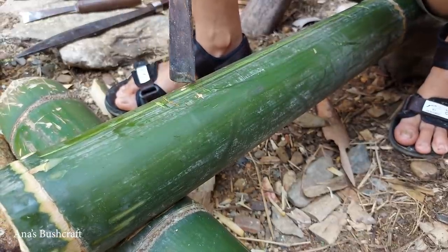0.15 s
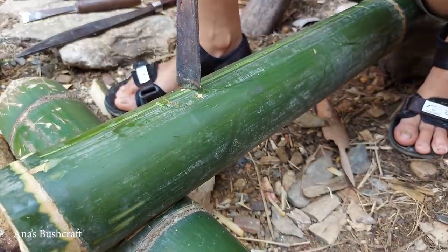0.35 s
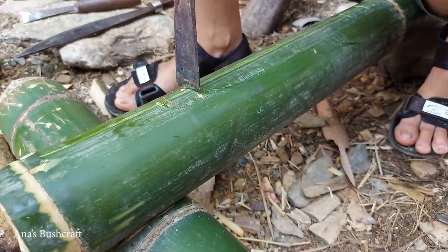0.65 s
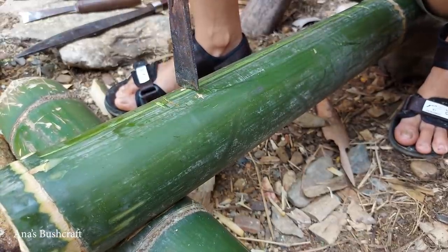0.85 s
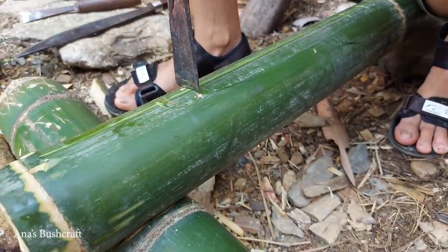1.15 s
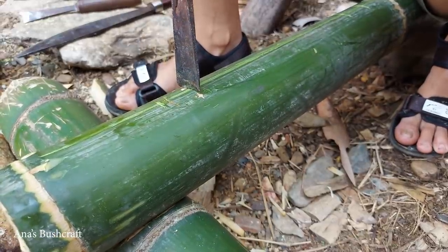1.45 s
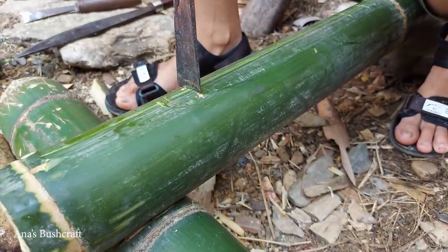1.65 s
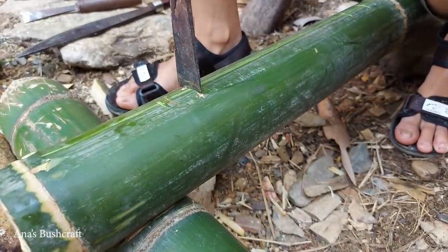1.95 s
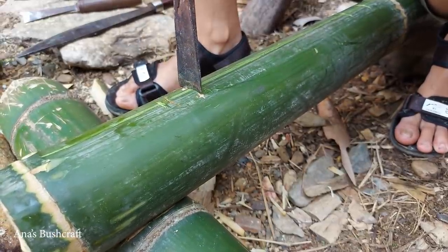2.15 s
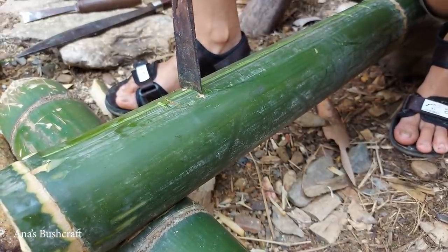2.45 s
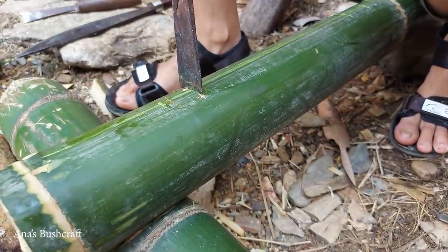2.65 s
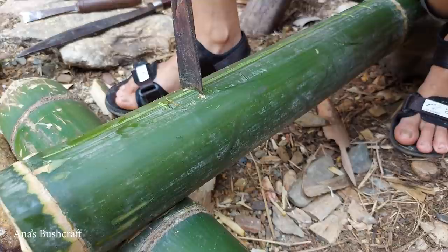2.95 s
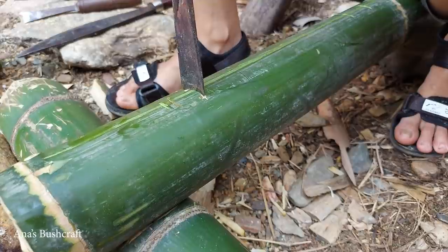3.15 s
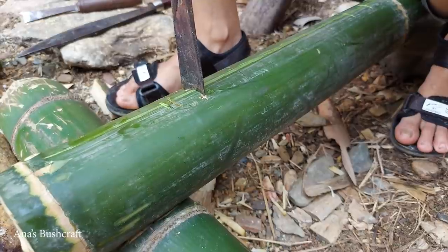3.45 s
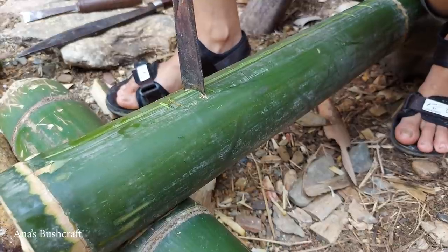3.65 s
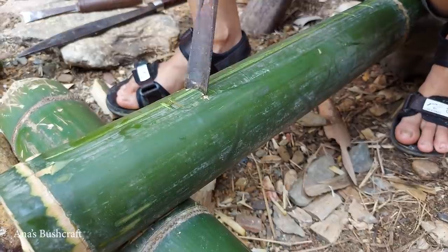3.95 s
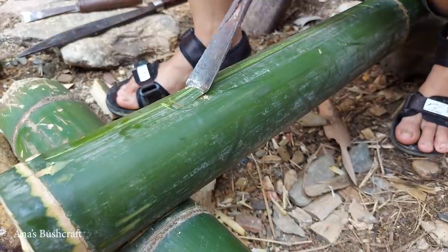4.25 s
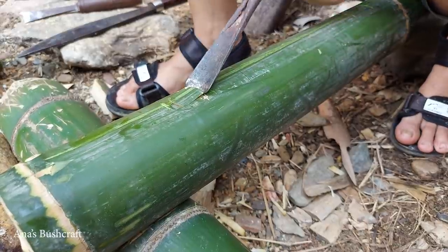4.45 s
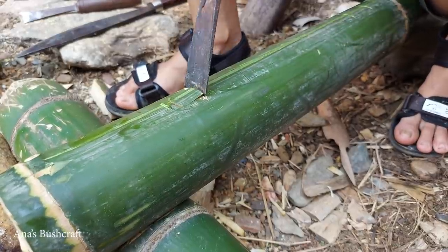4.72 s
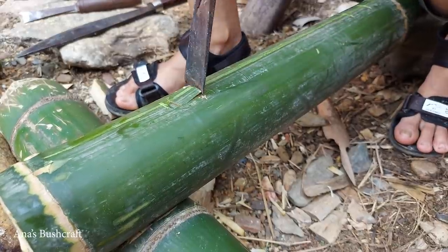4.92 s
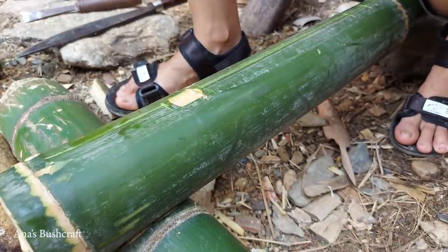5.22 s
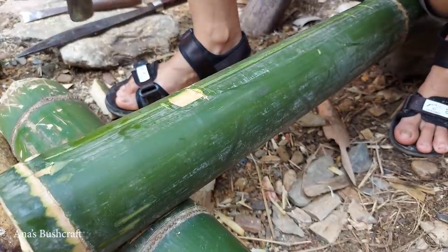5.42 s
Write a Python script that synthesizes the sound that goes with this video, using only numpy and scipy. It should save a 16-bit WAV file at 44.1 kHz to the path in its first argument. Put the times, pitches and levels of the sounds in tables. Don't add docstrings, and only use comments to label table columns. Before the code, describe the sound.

Bamboo working beside a stream: quiet bubbling water, then a steady run of seven loud, dry, near-clipping knocks with hollow tube ring and splitting crack, each trailed by a light clack and short open-air scatter. Automatic gain drops the water after the first blow. Later the blade is levered, snapping fibres sharply, pops loose with tiny high metallic ticks, and a chip lands on stone while the water returns.

```python
import sys
import numpy as np
from scipy import signal
from scipy.fft import rfft, irfft, next_fast_len
from scipy.io import wavfile
from scipy.ndimage import uniform_filter1d

SR = 44100
rng = np.random.default_rng(int(sys.argv[2]) if len(sys.argv) > 2 else 0)


def voltage_ratio(level):
    return 10 ** (np.asarray(level, float) / 20)


def pcm_store(signal):
    levels = np.round(np.clip(np.atleast_2d(signal), -1, 1) * 32767)
    wavfile.write(sys.argv[1], SR, levels.astype(np.int16).T)


N = 246078
HALVES = np.array([[.5], [-.5]])

# first contact in seconds, strength in dB, give of the pole in dB,
# split in dB, tilt of the shell's ring in dB per octave.
BLOWS = [
    (1.2345, 0.5, -6, -10, -11),
    (1.5881, 1, -6, -15, 2),
    (1.9613, 0.5, -8.5, -14, -3),
    (2.3485, -0.5, -14.5, -13, 0),
    (2.719, 1.5, -13.5, -18.5, 1),
    (3.1138, -0.5, -9.5, -14.5, 0.5),
    (3.4995, 2, -18, -9.5, -6.5),
]


def unit(x):
    return x / np.sqrt(np.mean(x ** 2) + 1e-20)


def along(points, hz):
    f, v = np.transpose(points)
    return np.interp(np.log(hz + 1), np.log(f + 1), v)


def filtered(x, response):
    m = next_fast_len(x.shape[-1] + 4096)
    spectrum = rfft(x, m) * response(np.fft.rfftfreq(m, 1 / SR))
    return irfft(spectrum, m)[..., :x.shape[-1]]


def add(track, s, sound):
    track[:, round(s * SR):][:, :sound.shape[1]] += sound


def patchy(spectrum, patchy_db):
    z = signal.stft(rng.standard_normal((2, N)), nperseg=512)[2]
    field = rng.standard_normal(z.shape[1:])
    field = uniform_filter1d(field, size=4, axis=0)
    field = uniform_filter1d(field, size=6, axis=1)
    pair = signal.istft(z * voltage_ratio(patchy_db * unit(field)), nperseg=512)[1][:, :N]
    return unit(filtered(pair, lambda hz: voltage_ratio(along(spectrum, hz))))


def bubbles(count, centre_hz, spread, cycles, scatter_db):
    draw, k = rng.random((count, 2)), np.arange(SR // 20)
    hz = centre_hz * np.exp(spread * rng.standard_normal((count, 1)))
    turns = k / SR * hz
    size = voltage_ratio(-scatter_db * np.log(draw[:, 1:] + 0.00038))
    envelope = size * turns * np.exp(-4 * turns / cycles)
    grains = envelope * np.sin(2 * np.pi * turns * (1 + 0.13 * turns / cycles))
    at = (draw[:, :1] * N).astype(int) + k
    return unit(np.bincount(at.ravel(), grains.ravel(), N + SR)[:N])


def stream():
    # time in seconds, level in dB.
    gain = [(0.0, -40.5), (0.23, -39), (0.43, -36), (0.96, -33), (1.13, -31.5), (1.3, -40), (2.22, -44),
            (3.54, -44.5), (3.81, -45.5), (4.33, -46), (4.82, -41.5), (5.33, -35), (5.58, -33.5)]
    # frequency in Hz, level in dB per Hz.
    gurgle_colour = [(25, -15), (60, -31.5), (130, -13), (260, -9.5), (345, 1.5), (440, -7), (600, -11.5),
                     (850, -9), (1000, -5.5), (1150, -12.5), (1600, -12.5), (2500, -18), (4500, -20.5),
                     (7000, -28), (11000, -29)]
    # frequency in Hz, level in dB per Hz.
    spray_colour = [(3000, -16), (6000, -2), (8600, -3.5), (9500, -3.5), (10500, 2), (12500, 2),
                    (15600, -3), (15900, -40)]
    # frequency in Hz, likeness from 0 to 1.
    alike = [(60, 0.88), (300, 1), (800, 0.76), (2000, 0.44), (4000, 0.37), (6000, 0.29)]
    # frequency in Hz, left minus right in dB.
    shade = [(60, 0.5), (99, 1), (160, -1.5), (270, -0.5), (450, 3), (740, -3.5), (1220, 0.5), (2010, 0),
             (3330, -2), (5500, -5), (9080, -3.5), (15000, -4)]
    gurgle_db, spray_db = 4.5, -8.5
    lag = 18

    water = patchy(gurgle_colour, patchy_db=2.0)
    water[0] += voltage_ratio(-7.5) * bubbles(count=900, centre_hz=337.8, spread=0.1724, cycles=9.5, scatter_db=3.0)
    water[0] += voltage_ratio(-10.5) * bubbles(count=1400, centre_hz=906, spread=0.432, cycles=6.8, scatter_db=-2.0)

    def blend(hz):
        angle = np.arccos(np.clip(along(alike, hz), -1, 1)) / 2
        return np.array([np.cos(angle), np.sin(angle)])

    shared, own = filtered(water, blend)
    water = unit(np.array([np.roll(shared + own, lag), shared - own]))
    spray = patchy(spray_colour, patchy_db=3.0)
    gain_db = np.interp(np.arange(N) / SR, *np.transpose(gain))
    both = voltage_ratio(gain_db) * (voltage_ratio(gurgle_db) * water + voltage_ratio(spray_db) * spray)
    return filtered(both, lambda hz: voltage_ratio(HALVES * along(shade, hz)))


def ring(modes, t, scatter_db, turn, tilt_db=0):
    hz, db, t60, pan_db, apart = np.transpose(modes)[:, :, None]
    db = db + tilt_db * np.log2(hz / 1050) + scatter_db * rng.standard_normal(hz.shape)
    level = voltage_ratio(db + pan_db * HALVES[:, None] - 60 * t / t60)
    phase = np.pi * np.arange(len(hz))[:, None] + apart * HALVES[:, None]
    phase = phase + turn * rng.standard_normal((2, len(hz), 1))
    return -(level * np.sin(2 * np.pi * hz * t + phase)).sum(axis=1)


def burst(spectrum, t):
    noise = rng.standard_normal((2, len(t))) + 0.84 * rng.standard_normal(len(t))
    return unit(filtered(noise, lambda hz: voltage_ratio(along(spectrum, hz))))


def contact(t, tube_db, wall_db, crack_db, tilt_db):
    # frequency in Hz, level in dB,
    # time to fall 60 dB in seconds, left minus right in dB, left minus right phase in radians.
    tube = [(133, -5, 0.048, 3, 0.4), (206, -6, 0.12, 2.5, 0.33), (293, -1, 0.069, 4, 0.67),
            (355, -4.5, 0.21, -1.5, 0.49), (428, -13.5, 0.154, 12, 0.62), (558, -8, 0.042, 15, 2.1),
            (746, 1, 0.023, -7, 0.85)]
    # frequency in Hz, level in dB,
    # time to fall 60 dB in seconds, left minus right in dB, left minus right phase in radians.
    shell = [(811, -16.5, .14, 3.5, 0.3), (907, -9, 0.094, 5.5, 0.36), (993, -9, 0.11, -3.5, 1.9),
             (1056.5, -3, 0.075, 1.5, 1.55), (1207, 4, 0.026, 0, 1), (1428, -4.5, 0.095, -2.2, 2.55)]
    # frequency in Hz, level in dB,
    # time to fall 60 dB in seconds, left minus right in dB, left minus right phase in radians.
    wall = [(1600, -18.5, 0.14, 23, -10.5), (1744, -11, 0.041, 7.5, 0.5), (1886, -14, 0.036, 33, 0.5),
            (2083, 1, 0.03, -8, 1.2), (2276, 0, 0.04, 1, 1.14), (2520, -15, 0.027, 26, 1.5),
            (3073, -12, 0.048, -5, 1.2), (3522, -6.5, 0.023, 13.5, 0.5), (3910, -25, 0.036, 4, 1),
            (4770, -22.5, 0.034, 17, 1.6), (5640, -20.5, 0.027, 17, -6)]
    # frequency in Hz, level in dB per Hz.
    wood = [(30, -17), (90, 0.5), (300, -1), (650, -2), (1100, 0.5), (2000, -8), (3000, -10), (5000, -15),
            (8000, -35)]
    # frequency in Hz, level in dB per Hz.
    crack = [(1500, -2), (3000, 4.5), (5000, -1.5), (8000, -6.5), (10500, 0), (13000, -12), (16000, -10)]

    pole = voltage_ratio(tube_db - 4.0) * ring(tube, t, scatter_db=3.5, turn=0.14)
    pole += voltage_ratio(-5) * ring(shell, t, scatter_db=0.4, turn=0.19, tilt_db=tilt_db)
    pole += voltage_ratio(wall_db + 1.0) * ring(wall, t, scatter_db=2.5, turn=0.58)
    knock = burst(wood, t) * (voltage_ratio(-8 - 60 * t / .03) + voltage_ratio(-26 - 60 * t / .2))
    tearing = voltage_ratio(-60 * t / .012) + voltage_ratio(-26 - 60 * t / .045)
    split = voltage_ratio(crack_db + 4.0) * burst(crack, t) * tearing
    onset = 1 - np.exp(-t / 0.00022)
    return (pole + knock + split) * onset


def clearing(sound):
    # frequency in Hz, time to fall 60 dB in seconds.
    fade = [(100, 0.3), (400, 0.16), (1100, 0.14), (3000, 0.32), (6000, 0.074), (12000, 0.02)]
    hz, t, z = signal.stft(rng.standard_normal((2, SR // 3)), SR, nperseg=256)
    tail = signal.istft(z * voltage_ratio(-60 * t / along(fade, hz)[:, None]), SR, nperseg=256)[1]
    return signal.fftconvolve(sound, tail / np.linalg.norm(tail[0]), axes=1)


def blows():
    # recoil delay in seconds, extra split at the recoil in dB,
    # thud into the ground in dB, ring of the wall in dB.
    recoil = [(0.0095, 3, -10, -13.5), (0.0083, 13, -16, -16.5), (.009, 1, -19, -12),
              (0.011, -16, -14.5, -10), (0.0054, 8.5, -25.5, -11.5), (0.0055, 4, -28, -14),
              (0.0096, -17, -31, -12)]
    recoil_db, thud_pan_db = -10.5, -6.5
    out, t = np.zeros((2, N + SR)), np.arange(SR // 3) / SR
    for blow, seat in zip(BLOWS, recoil):
        s, db, give_db, crack_db, tilt_db = blow
        delay, split_db, thud_db, wall_db = seat
        thud_level = voltage_ratio(thud_db + thud_pan_db * HALVES - 60 * t / 0.078)
        thud = thud_level * np.sin(2 * np.pi * 80 * t + 2.83 - 0.44 * HALVES)
        level = voltage_ratio(db + 1.8 * np.exp(-t / 0.0046))
        sound = level * (thud + contact(t, give_db, wall_db, crack_db, tilt_db))
        again = voltage_ratio(db + recoil_db) * contact(t, give_db, wall_db, crack_db + split_db, tilt_db)
        add(out, s, sound)
        add(out, s + delay, again)
        add(out, s + .004, voltage_ratio(-19.0) * clearing(sound))
    return out[:, :N]


def snap(db, hz, octaves, t60, pan_db=0):
    t = np.arange(SR // 10) / SR
    noise = rng.standard_normal((2, len(t))) + 0.21 * rng.standard_normal(len(t))
    band = unit(filtered(noise, lambda f: np.exp(-.5 * (np.log2((f + 1) / hz) / octaves) ** 2)))
    return voltage_ratio(db - 3 + pan_db * HALVES - 60 * t / t60) * band * (1 - np.exp(-t / .0004))


def rebounds():
    # time in seconds, peak in dB.
    falls = [(1.2634, -21.5), (1.621, -29), (1.995, -28), (2.383, -27.5), (2.7536, -29), (3.1484, -23.5),
             (3.5356, -19.5)]
    out = np.zeros((2, N + SR))
    for s, db in falls:
        add(out, s, snap(db + 0.5, hz=6300, octaves=1.6, t60=0.02))
        add(out, s, snap(db + 5.5, hz=1900, octaves=.8, t60=0.031))
    return out[:, :N]


def wood_ticks():
    # time in seconds, peak in dB, centre in Hz.
    ticks = [(1.682, -33, 1990), (4.037, -32, 450), (4.682, -32.5, 2200), (5.077, -29.5, 1150),
             (5.1673, -19.5, 500), (5.1682, -25, 1080)]
    out = np.zeros((2, N + SR))
    for s, db, hz in ticks:
        add(out, s, snap(db, hz, octaves=0.34, t60=0.037))
    return out[:, :N]


def parting_fibres():
    # time in seconds, peak in dB, centre in Hz, time to fall 60 dB in seconds.
    fibres = [(3.529, -34, 4500, .05), (3.9398, -30.5, 8000, 0.044), (3.9585, -20.5, 13000, 0.012),
              (3.9655, -29, 16000, .008), (4.013, -10, 13000, 0.0054), (4.014, -29, 11000, .016),
              (4.036, -25.5, 11000, 0.013), (4.845, -36, 12000, .08), (4.985, -30, 7000, .025),
              (5.1686, -23, 9000, .033), (5.173, -12, 11000, .018), (5.1736, -15.5, 3500, 0.02)]
    out = np.zeros((2, N + SR))
    for s, db, hz, t60 in fibres:
        add(out, s, snap(db, hz, octaves=0.96, t60=t60, pan_db=2.2))
    return out[:, :N]


def struck(touches, bands):
    out = np.zeros((2, N + SR))
    for s, db, pan_db in touches:
        for hz, level, octaves, t60 in bands:
            add(out, s, snap(db + level, hz, octaves, t60, pan_db))
    return out[:, :N]


def freed_blade():
    # time in seconds, peak in dB, left minus right in dB.
    tings = [
        (5.1765, -14.5, 4),
        (5.3283, -14, 11),
    ]
    # frequency in Hz, level in dB, width in octaves, time to fall 60 dB in seconds.
    steel = [(11400, 1, 0.13, .008), (10460, -11, .06, 0.021)]
    return struck(tings, steel)


def falling_chip():
    # time in seconds, peak in dB, left minus right in dB.
    landing = [
        (5.4558, -15, 7),
    ]
    # frequency in Hz, level in dB, width in octaves, time to fall 60 dB in seconds.
    chip = [(1700, -6.5, .1, 0.051), (2260, 0, .15, 0.034), (3100, -3, .12, 0.041), (4530, -3, 0.4, 0.029)]
    return struck(landing, chip)


def scene():
    small = rebounds() + wood_ticks() + parting_fibres() + freed_blade() + falling_chip()
    return stream() + blows() + small


def band_limit(x):
    return signal.sosfilt(signal.butter(12, 16320, fs=SR, output="sos"), x)


def record(dry):
    t, dip_db = np.arange(N) / SR, np.zeros(N)
    for s, *_ in BLOWS:
        dip_db -= 14 * np.clip(1 - (s - t) / 0.0089, 0, 1) * (t < s)
    low_cut = signal.butter(2, 62, "high", fs=SR, output="sos")
    x = signal.sosfilt(low_cut, dry * voltage_ratio(dip_db))
    x = x / (1 + np.abs(x / .99) ** 12) ** (1 / 12)
    x = filtered(x, lambda hz: 1 / (1 + (hz / 15850) ** 80))
    return band_limit(x)


dry = scene()
out = record(dry)
pcm_store(out)
```